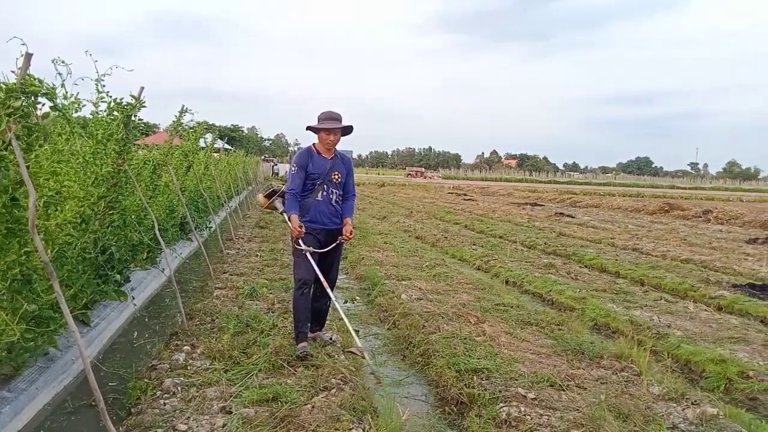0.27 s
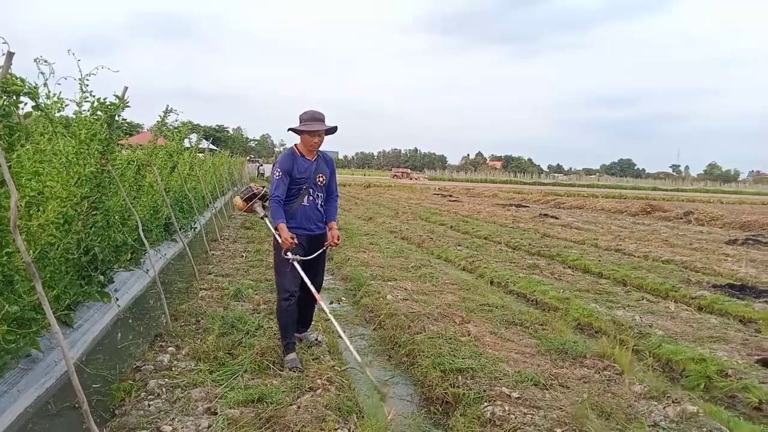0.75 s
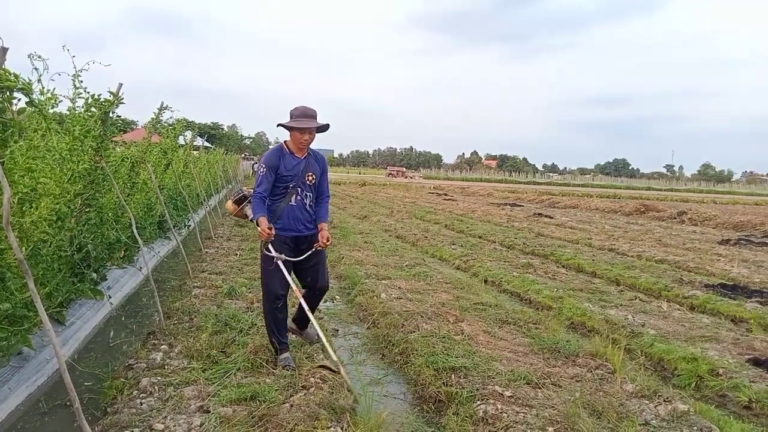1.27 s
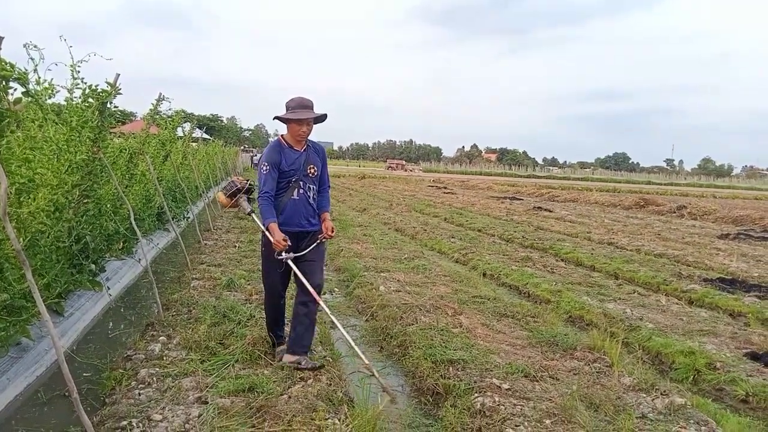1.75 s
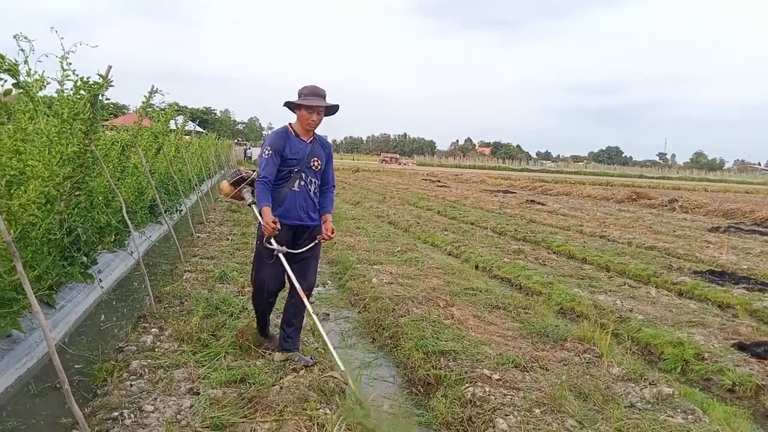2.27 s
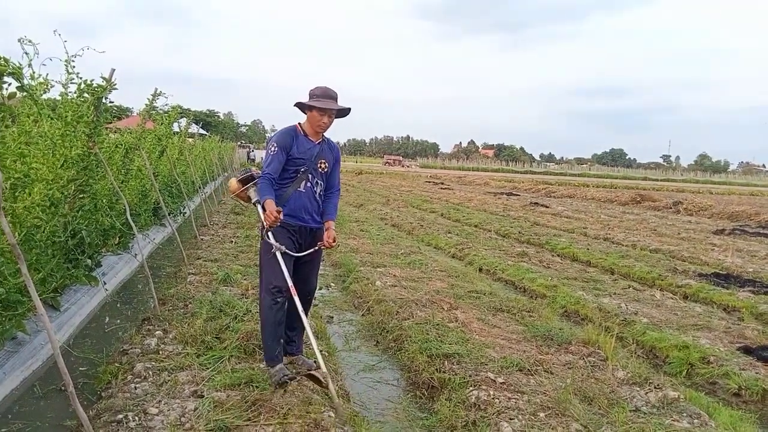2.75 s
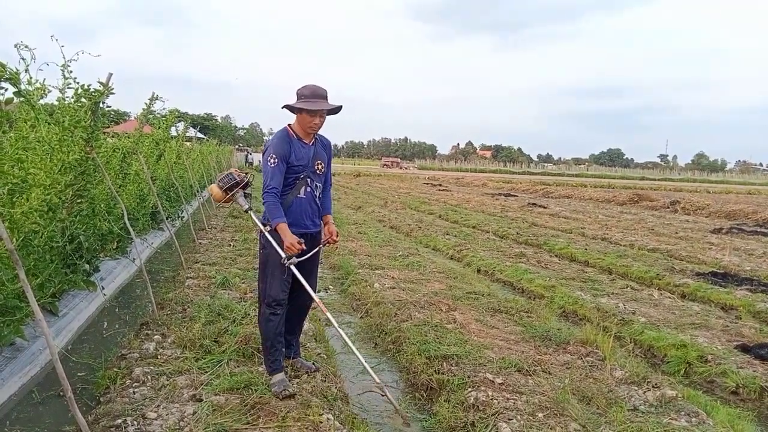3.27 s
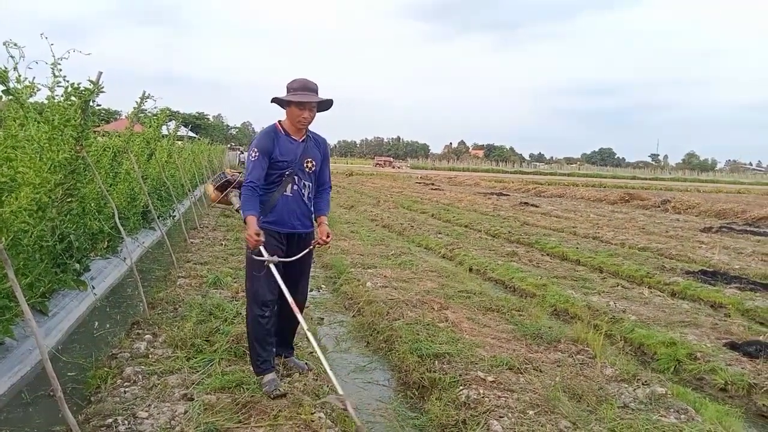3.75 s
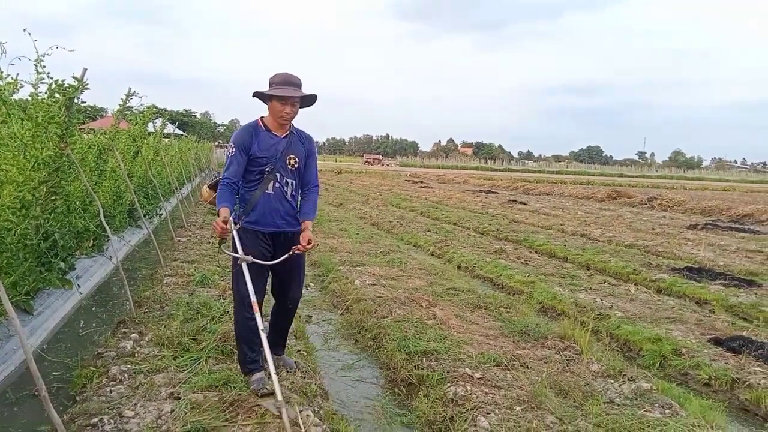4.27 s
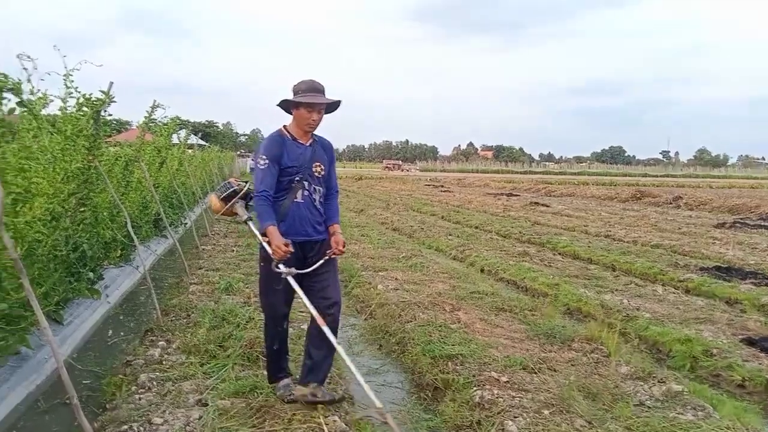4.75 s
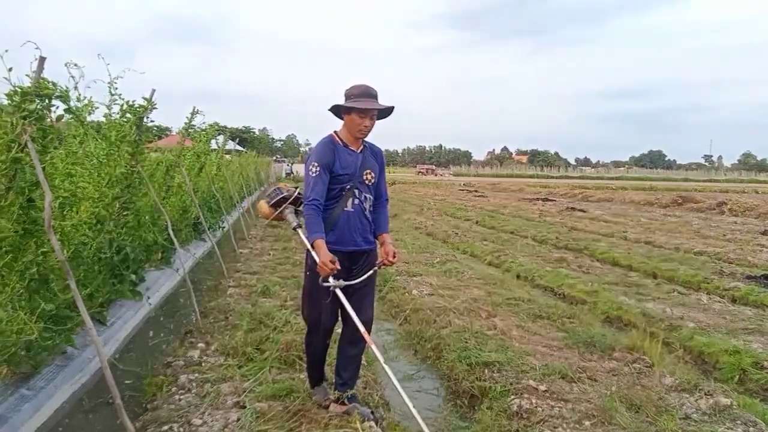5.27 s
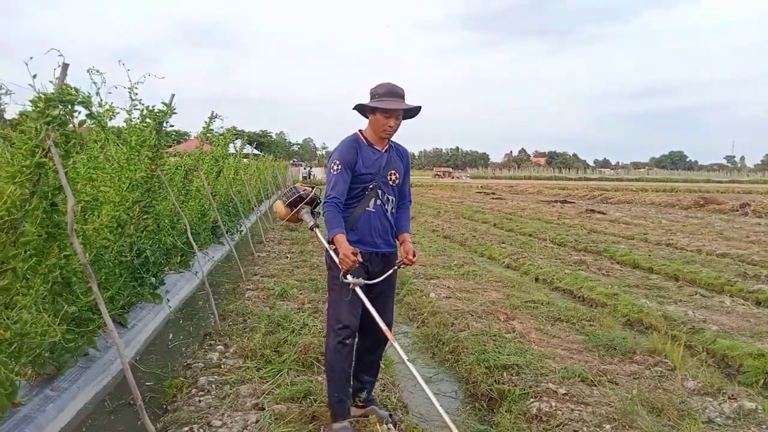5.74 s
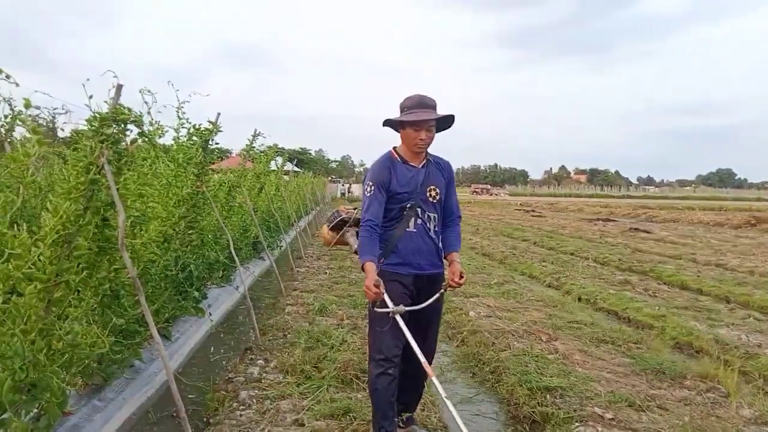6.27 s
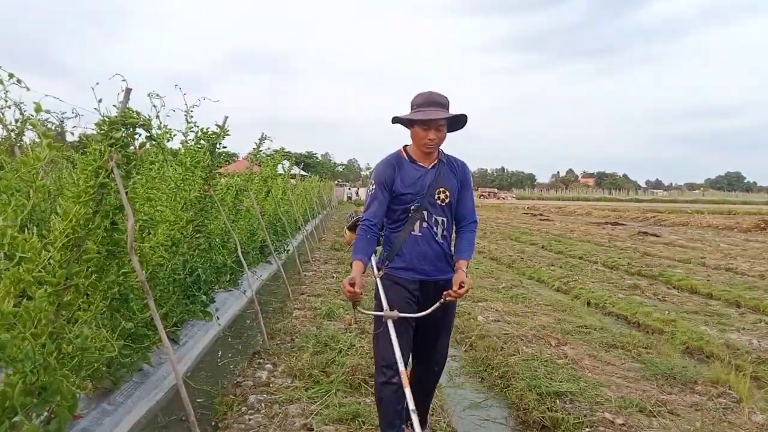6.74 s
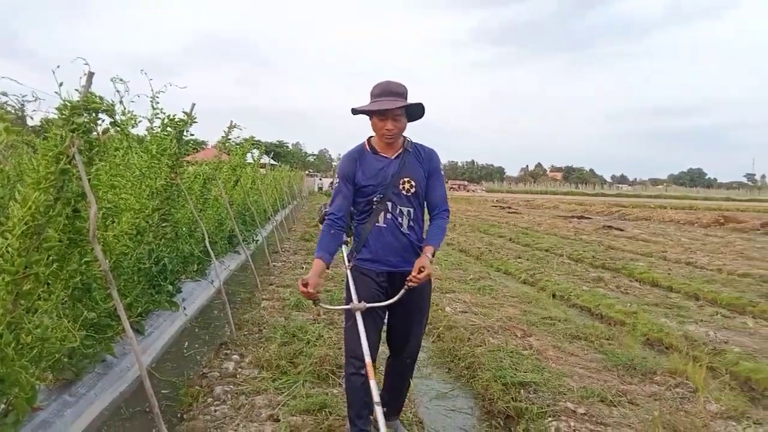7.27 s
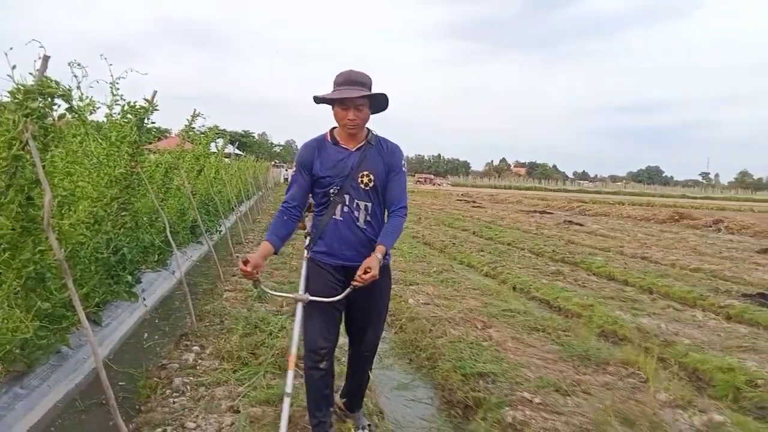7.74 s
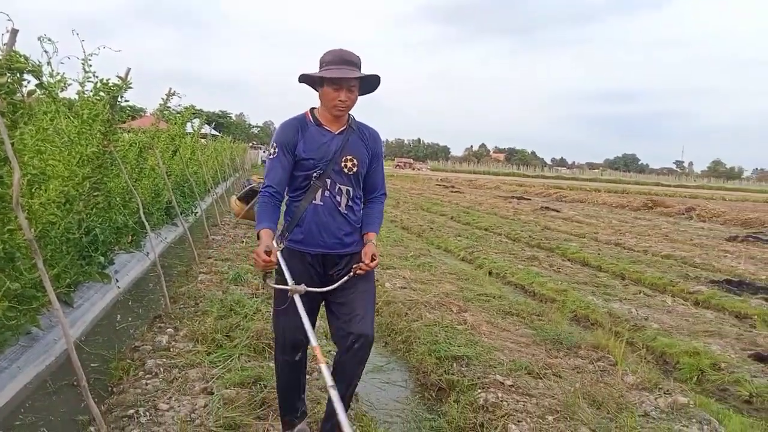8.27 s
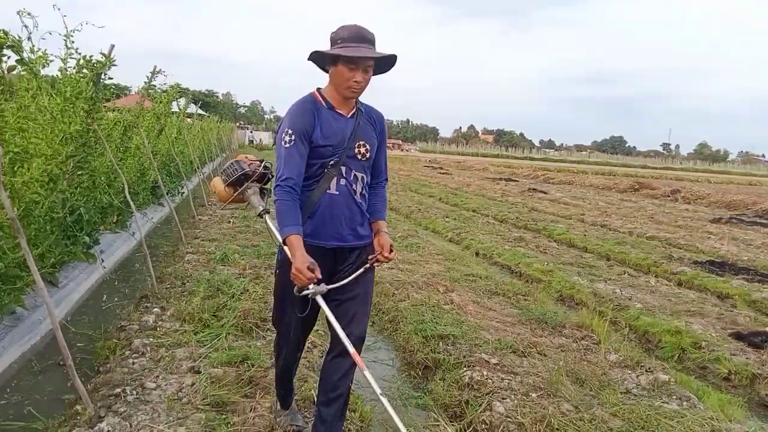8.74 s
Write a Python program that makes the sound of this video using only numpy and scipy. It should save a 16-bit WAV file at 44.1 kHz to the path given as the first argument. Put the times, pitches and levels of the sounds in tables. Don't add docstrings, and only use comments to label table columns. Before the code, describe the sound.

A petrol brush cutter drones and snarls steadily outdoors, its blade hissing through grass with sharp clicks and metallic rings as it comes closer.

```python
import sys
import numpy as np
from scipy import signal
from scipy.fft import rfft, irfft, next_fast_len
from scipy.io import wavfile
from scipy.ndimage import uniform_filter1d

SR = 44100
rng = np.random.default_rng(int(sys.argv[2]) if len(sys.argv) > 2 else 0)


def to_wav(sig):
    pcm = np.clip(np.atleast_2d(sig), -1, 1) * 32767
    pcm = np.round(pcm).astype(np.int16)
    wavfile.write(sys.argv[1], SR, pcm.T)


def boost(x):
    u = np.asarray(x, float) / 20
    return 10 ** u


N = 397341


def evened(x):
    return x / np.sqrt(np.mean(x ** 2) + 1e-20)


def curves(rows):
    s, *columns = np.transpose(rows)
    return [np.interp(np.arange(N) / SR, s, c) for c in columns]


def wander(hz):
    f = np.fft.rfftfreq(N // 64, 64 / SR)
    slow = irfft(rfft(rng.standard_normal(N // 64)) / (1 + (f / hz) ** 4), N // 64)
    return np.interp(np.arange(N) / 64, np.arange(N // 64), evened(slow))


def clicks(turns, spread_db):
    return (np.diff(np.floor(turns), prepend=9) > 0) * boost(spread_db * rng.standard_normal(N))


def decay(x, tau_s):
    return signal.lfilter([1], [1, -np.exp(-1 / (tau_s * SR))], x)


def swell(rows, column, t60_s):
    rise_s = 0.039
    t, power = np.arange(0, N, 64) / SR, 1e-12
    for row in rows:
        since = t - row[0]
        fall_db = np.where(since < 0, 9 * (since / rise_s) ** 2, 60 * since / t60_s)
        power = power + boost(row[column] - fall_db) ** 2
    return np.interp(np.arange(N) / SR, t, np.sqrt(power))


def butter(x, order, hz, kind):
    return signal.sosfilt(signal.butter(order, hz, kind, fs=SR, output="sos"), x)


def band(x, lo_hz, hi_hz):
    return evened(butter(x, 2, [lo_hz, hi_hz], "bandpass"))


def coloured(x, points):
    f, db = np.transpose(points)
    size = next_fast_len(N + 4096)
    hz = np.fft.rfftfreq(size, 1 / SR)
    gain = boost(np.interp(np.log(hz + 1), np.log(f + 1), db))
    return irfft(rfft(x, size) * gain, size)[:N]


def ring(x, modes):
    out = np.zeros(N)
    for hz, width, db in modes:
        pole = np.exp((2j * np.pi * hz - np.pi * abs(width)) / SR)
        out += boost(db) * signal.lfilter([1], [1, -pole], x + 0j).imag
    return out


def glide(x, hz, width):
    turn = np.exp(2j * np.pi * np.cumsum(hz) / SR)
    r = np.exp(-np.pi * width / SR)
    return (turn * signal.lfilter([1], [1, -r], x / turn)).imag


# time in seconds, muffler in view in dB, drive slack in dB.
POSE = [(0, -8, -9), (.3, 6, -2), (.8, 8.5, 0.5), (1.2, 0.5, -3), (1.86, 7.5, 1), (2.6, -6, -1.5),
        (3.0, -12, -6), (3.2, 3, 6), (3.6, 5.5, 3.5), (3.85, -1.5, -8), (4.24, -17, -5), (4.72, 5.5, -1),
        (5.1, 3, 5), (5.5, 0, 0), (6.2, -1, 3), (6.95, -32, -2), (7.9, -3, -3.5), (8.85, 11, 6)]
# time in seconds, drive beats per firing.
SLIP = [(0, 0.34), (2.2, 0.34), (3.35, 0.32), (4.2, .34), (4.95, 0.37), (5.8, 0.36), (6.85, .398),
        (7.8, 0.37), (8.3, 0.35), (9.01, .345)]
# delay in seconds, share returned.
ECHOES = [(.00255, .95), (.0051, .15)]


def engine(turns, near_db):
    view_db, slack_db = curves(POSE)
    rattle_db = slack_db - 33.5
    beat = np.cumsum(curves(SLIP)[0] * np.gradient(turns))
    sway = boost(11.5 + .45 * rattle_db) * np.cos(2 * np.pi * beat + .5 * wander(2))
    puff = np.exp(-(turns % 1) / .4) * rng.standard_normal(N)
    fire = evened(clicks(turns + .0014 * wander(60), .8) * (1 + .08 * sway))
    drive = fire + .065 * evened(puff)
    for s, share in ECHOES:
        drive = drive + share * np.roll(fire, round(s * SR))
    return (firing_orders(turns, sway, near_db, view_db) + muffler_can(turns, sway, puff)
            + outlet(fire, puff, drive) + loose_drive(beat, drive, rattle_db) + fin_whine(turns))


# multiple of the firing rate, level in dB.
ORDERS = [(1, -1), (2, -20), (3, -1), (4, -18), (5, -4), (6, -6), (7, 0), (8, 0), (9, -13), (10, -7),
          (11, -3), (12, -7)]


def firing_orders(turns, sway, near_db, view_db):
    lines = [boost(db + wander(55)) * np.cos(2 * np.pi * k * (turns - 0.02785 * k)) for k, db in ORDERS]
    dips = boost(1.5 * near_db) * (lines[3] + lines[8] + lines[9])
    upper = lines[1] + boost(.4 * near_db) * lines[2] + dips + boost(-.8 * near_db - 2) * lines[10] + lines[11]
    steady = boost(-43) * (lines[0] + upper * (.85 + .3 * sway)) / np.std(lines[0])
    hum = evened(lines[7]) * (1 + .08 * sway)
    return steady + boost(view_db - 42) * hum


# frequency in Hz, width in Hz, level in dB.
BODY = [(395, 50, 2), (555, 50, 3), (475, 50, -1)]
# time in seconds, level in dB.
CAN = [(0, -10), (.35, 0.5), (.95, 1), (1.15, -7.5), (1.6, 0.5), (2.05, 1), (2.5, -1.5), (3.15, 4),
       (3.5, 2), (3.95, -1.5), (4.3, -4), (4.8, 2.5), (5.3, 0.5), (5.5, 0.5), (6.2, -0.5), (6.8, -3),
       (7.6, -2.5), (8.25, -3.5), (8.6, 1.5), (9.01, 1)]


def muffler_can(turns, sway, puff):
    limp = .005 * (1 + .3 * wander(3)) * np.cos(np.pi * turns)
    thumps = clicks(turns + limp + .12, .5) * (1 + .4 * sway)
    boom = band(band(band(ring(thumps, BODY), 360, 660), 350, 680), 350, 700)
    boom = boom + .1 * band(band(puff, 370, 670), 370, 670)
    return boost(curves(CAN)[0] - 40.5) * evened(boom)


# time in seconds, level in dB, aim (upper ring over lower) in dB,
# lower ring in Hz, lowest ring in dB.
OUTLET = [(0, -28.5, -2.5, 1510, 5.5), (.6, -25, -11, 1540, -7), (.85, -21.5, -2.5, 1500, -12),
          (1.2, -25.5, -7, 1490, -2), (1.63, -23, -1.5, 1530, -1), (1.85, -26.5, -7.5, 1535, -5.5),
          (2.4, -25, -1.5, 1520, 1), (2.65, -26.5, -7.5, 1450, -17), (3.03, -26.5, 5, 1530, -1),
          (3.55, -33, -19, 1680, -6), (3.94, -27.5, 1, 1690, 3.5), (4.31, -34.5, -9, 1560, -1),
          (4.77, -25, -3, 1725, -4), (5.25, -25.5, -3.5, 1590, -2.5), (5.74, -22.5, -1.5, 1550, -7),
          (6.2, -23, -4, 1530, -9.5), (6.5, -22.5, -5, 1500, -2.5), (7.3, -26, 3.5, 1440, 2.5),
          (7.9, -30, 2, 1540, 2), (8.15, -24.5, 3, 1480, 2), (8.4, -21, -12, 1414, -10),
          (8.65, -25.5, -9.5, 1430, -0.5), (9.0, -23, -6.5, 1730, -2)]
# frequency in Hz, width in Hz, level in dB.
OUTLET_LOW = [(1115, 118, -5.5)]
OUTLET_HIGH = [(1855, 25, -11), (2119, 44, 2)]


def outlet(fire, puff, drive):
    outlet_db, aim_db, lower_hz, lowest_db = curves(OUTLET)
    upper_hz = 1973 + 11 * aim_db + 25 * wander(6)
    lowest = boost(lowest_db + 3.0 * wander(21)) * ring(1.4 * fire + .4 * evened(puff), OUTLET_LOW)
    low = band(lowest + glide(drive, lower_hz, 212), 1080, 1710)
    high = band(ring(drive, OUTLET_HIGH) + glide(drive, upper_hz, 193), 1620, 2040)
    return boost(outlet_db + aim_db / 2 - 4.0) * high - boost(outlet_db - aim_db / 2 - 9.0) * low


# frequency in Hz, width in Hz, level in dB.
CASING = [(2719, 110, 12), (3208, 34, -1), (3800, 110, 7), (5050, 250, 10)]
# time in seconds, level in dB.
KNOCKS = [(.42, -38), (.57, -37), (.95, -44), (1.3, -42), (1.62, -37), (2.0, -34), (2.07, -43), (2.25, -40),
          (3.2, -35), (3.47, -34), (3.75, -39), (4.35, -45), (4.9, -42), (5.45, -37), (6.3, -49),
          (8.4, -47), (8.75, -46)]


def loose_drive(beat, drive, rattle_db):
    bumps = evened(clicks(beat + .008 * wander(20), 1.2))
    burble = band(band(band(bumps, 350, 670), 350, 670), 340, 690)
    burble_level = np.hypot(swell(KNOCKS, 1, 0.7), boost(rattle_db - 16))
    scrape = np.exp(-(beat % 1) / 0.99) * rng.standard_normal(N)
    rattle = band(ring(bumps + 1.6 * scrape + 0.086 * drive, CASING), 2660, 3550)
    return burble_level * burble + boost(rattle_db - 3.5) * rattle


# time in seconds, level in dB.
FINS = [(0, -65), (4.4, -56), (4.9, -48), (6.2, -54), (6.5, -44), (7.1, -42), (7.4, -51), (7.8, -44),
        (8.2, -50), (9.01, -46)]


def fin_whine(turns):
    return boost(curves(FINS)[0]) * np.sqrt(2) * np.cos(2 * np.pi * 15 * turns)


# time in seconds, level in dB.
GRASS = [(0, 6), (.3, 5.5), (.98, 6), (1.4, 4), (2, 9.5), (2.7, 4), (2.82, 8), (3.05, 5.5), (3.6, 7),
         (3.85, 9), (4.3, 8), (4.8, 7.5), (5.5, 9), (6.15, 8.5), (7.05, 10), (7.5, 13), (8.05, 7),
         (9.01, 11)]
# time in seconds, grit in dB,
# then low, high and top plate rings in dB.
BITES = [(.05, -37.5, -58, -60, -68), (2.385, -28.5, -41, -34, -66), (2.43, -35, -36, -40, -59),
         (2.505, -25.5, -25, -29, -53), (3.69, -33.5, -55, -33, -70), (3.94, -29.5, -33, -34, -56),
         (4.15, -60, -29.5, -56, -66), (4.49, -47, -55, -43, -70), (5.04, -37, -55, -38, -70),
         (5.3, -30.5, -48, -29, -51), (5.42, -35, -38, -50, -55), (6.56, -28, -32, -36, -34),
         (6.614, -26.5, -18.5, -30, -51), (6.68, -29.5, -38, -29.5, -35), (6.769, -29.5, -31, -22.5, -35),
         (6.88, -42, -24, -27, -61), (7.25, -26.5, -41, -27, -42), (7.33, -44, -32, -50, -60),
         (7.55, -49, -25.5, -32, -60), (7.6, -49, -34, -40, -60), (7.71, -42, -26, -28, -48),
         (7.81, -48, -25, -30.5, -60), (7.66, -45, -27, -29.5, -42), (7.76, -41, -24, -36, -55),
         (7.85, -43, -28, -38, -65), (7.935, -30, -40, -28, -50), (8.66, -34, -58, -50, -72)]


def blade(turns):
    grass_db, = curves(GRASS)
    spin = 2 * np.pi * .692 * turns
    cut = np.hypot(boost(grass_db - 44), swell(BITES, 1, 0.33))
    rub = rubbing(spin)
    swish = band(band(rub, 2300, 19000), 2000, 19000)
    hit, low_hit = strikes()
    spray = decay(hit, 0.0051) * rng.standard_normal(N)
    return (grass_hiss(rub, cut * swish, spray, hit) + guard(rub, spin, grass_db)
            + struck_steel(spin, cut * swish, spray, hit, low_hit) + plate(spin) + pings() + ticks())


def rubbing(spin):
    size = boost(3.6 * np.minimum(rng.exponential(1, N), 3))
    grit = size * (rng.random(N) < 2500 / SR) * rng.choice([-1, 1], N)
    pulse_db = 2.0 * np.cos(2 * spin) + 0.57 * np.cos(spin) + 2.3 * wander(39)
    return (evened(grit) + 1.64 * rng.standard_normal(N)) * boost(pulse_db)


# time in seconds, peak in dB, dull ring over peak in dB.
STRIKES = [(0.088, -24, -6), (2.2282, -17, 6), (2.4407, -17, 8), (2.47, -17.5, 13), (2.5019, -16, 17.5),
           (2.5347, -28, 23), (3.4712, -18, 2), (3.706, -17.5, 3), (3.914, -26, -5), (4.1063, -26, 7),
           (5.2806, -14, 5), (5.3012, -9, -3), (5.5113, -21, 14), (5.595, -18, 7), (6.5214, -14.5, 0),
           (6.567, -9.5, -19), (6.587, -9, 4), (6.6645, -19, -2), (6.7022, -11, 5), (6.767, -13, -16),
           (6.8799, -12.5, -7), (7.1825, -14, 3), (7.2093, -14, 4), (7.3147, -17.5, 9), (7.4013, -13.5, -6),
           (7.658, -22, -19), (7.701, -11, -3), (7.755, -23, -1), (7.901, -10.5, -12)]


def strikes():
    hit, low_hit = np.zeros((2, N))
    for s, peak_db, low_ring_db in STRIKES:
        hit[round(s * SR)] += boost(peak_db)
        low_hit[round(s * SR)] += boost(peak_db + low_ring_db)
    return hit, low_hit


# frequency in Hz, level in dB per Hz.
HISS = [(530, -4), (900, -0.5), (1260, 13.5), (1470, 16.5), (1670, 5), (1910, 15), (2450, 0), (2830, -8),
        (3720, -7.5), (4040, -13), (5850, -22), (6750, -27), (10600, -41), (13800, -28), (15600, -39)]


def grass_hiss(rub, swish, spray, hit):
    mix = boost(20.5) * swish + boost(-23) * spray + boost(-9) * hit
    return coloured(mix, HISS) / np.std(coloured(rub, HISS))


# frequency in Hz, width in Hz, level in dB.
GUARD = [(3894, 110, 10), (4050, 210, 4.5), (4597, 42, 0)]


def guard(rub, spin, grass_db):
    brushed = boost(grass_db - 38.5 + 3.0 * wander(1.9))
    level = np.hypot(brushed, boost(8) * swell(BITES, 3, 0.43))
    return level * boost(-11.5) * band(ring(rub, GUARD), 4010, 4396) * (1 + 0.15 * np.cos(spin))


# frequency in Hz, width in Hz, level in dB.
BLADE_LOW = [(1350, 12, -8), (1160, 14, -12), (1870, 12, -3), (1945, 14, -6), (2155, 14, 0), (2265, 10, -9)]
BLADE_HIGH = [(4035, 16, 0), (3830, 12, -6), (4352, 10, -4), (3188, 12, -6), (2905, 14, -6),
              (5480, 30, -24), (6340, 30, -26)]


def struck_steel(spin, swish, spray, hit, low_hit):
    sweep = evened(.5 + 0.38 * np.cos(spin) + .5 * np.cos(2 * spin + 1))
    bright = ring(boost(-27) * hit + boost(-31.5) * spray + boost(-39) * swish, BLADE_HIGH)
    dull = ring(boost(-14.5) * low_hit, BLADE_LOW)
    return butter(sweep * bright + dull, 2, 1000, "highpass")


# frequency in Hz, level in dB, share swept by the turning.
PLATE = [(1453, -2, .8), (3977, -1, .9), (3522, -2, .8), (5176, -2, .1)]
RING_T60_S = [0.93, 0.49, 0.38, 0.17]
# time in seconds, level in dB.
SIDE_BITES = [
    (6.56, -38),
    (6.73, -38),
    (6.775, -24),
    (6.89, -34),
    (7.24, -36),
    (7.7, -42),
    (7.93, -33),
]


def plate(spin):
    slip, rasp_db = .45 * wander(30), 1.5 * wander(50)
    sources = [(BITES, 2), (BITES, 3), (SIDE_BITES, 1), (BITES, 4)]
    out = np.zeros(N)
    for (hz, db, swept), (rows, column), t60_s in zip(PLATE, sources, RING_T60_S):
        start = 2 * np.pi * rng.random(4)
        phase = 2 * np.pi * hz * np.arange(N) / SR + slip
        side = np.cos(phase + spin + start[1])
        side = side + 0.7 * np.cos(phase - spin + 2 * start[0] - start[1])
        side = side + 0.18 * np.cos(phase - 2 * spin + start[3])
        lines = np.cos(phase + start[0]) + swept * side
        out += swell(rows, column, t60_s) * boost(db + rasp_db) * evened(lines)
    return out


# time in seconds, peak in dB, frequency in Hz, decay to -60 dB in seconds.
PINGS = [(2.3635, -29, 5310, 0.025), (2.469, -18, 2150, 0.046), (2.4753, -32, 8200, .03),
         (2.4995, -25, 6090, 0.04), (2.5025, -18, 2160, 0.022), (3.148, -36, 5100, .02),
         (3.5094, -33, 5100, .02), (3.66, -41, 5400, 0.038), (3.9305, -38, 6360, .04),
         (3.971, -37, 5430, .04), (4.4837, -39, 5430, 0.039), (7.756, -32, 5420, 0.11),
         (5.31, -33, 5400, 0.1), (5.312, -30, 6630, 0.045), (5.5967, -27, 6500, .015),
         (5.675, -41, 5570, .04), (6.071, -38, 5550, 0.038), (6.528, -18, 4360, 0.19),
         (6.567, -21, 2850, .12), (6.57, -24, 4330, 0.22), (6.585, -30, 6700, 0.048),
         (6.64, -21, 2850, .15), (6.70, -22, 4330, 0.33), (6.76, -36, 6800, .05), (6.879, -40, 6300, 0.066),
         (7.182, -18, 2040, 0.033), (7.221, -32, 6850, 0.04), (7.25, -36, 6300, 0.017),
         (7.40, -38, 5160, 0.054), (7.4894, -47, 6070, .04), (7.5073, -36, 5320, .05),
         (7.626, -26, 4250, .25), (7.65, -33, 5400, .15), (7.66, -39, 6050, 0.26), (7.701, -33, 5510, 0.23),
         (7.754, -28, 3200, 0.21), (7.90, -36, 5400, .3), (7.905, -25, 3240, 0.32),
         (7.9278, -17, 4000, 0.19), (8.627, -39, 5380, 0.038)]


def pings():
    out, spit, t = np.zeros(N + SR), np.zeros(N), np.arange(SR // 3) / SR
    for s, db, hz, t60 in PINGS:
        i = round(s * SR)
        rise = np.minimum(t / (0.00014 + 0.085 * t60), 1)
        out[i:i + len(t)] += boost(db - 60 * t / t60) * rise * np.sin(2 * np.pi * hz * t)
        spit[i] = boost(-43.5 + .5 * (db + 21.0))
    dust_hz = 13940
    dust = decay(spit, 0.0057) * band(rng.standard_normal(N), 0.83 * dust_hz, 1.16 * dust_hz)
    return out[:N] * boost(4.5 * wander(140)) + dust


# time in seconds, treble
# peak in dB, body over treble in dB.
TICKS = [(0.0245, -32.5, 5), (0.086, -33, 8), (0.5756, -41, 10), (1.4346, -43, 8), (1.5753, -38, 14),
         (1.6132, -44, 8), (1.6482, -42, 8), (1.9495, -44, 6), (1.9894, -36, 8), (2.0278, -36, 8),
         (2.0652, -37, 8), (2.3455, -29, 10), (3.9115, -38, 6), (3.93, -31, 8), (4.0048, -41, 8),
         (4.0567, -42, 6), (4.0701, -35, 8), (4.1036, -33, 8), (4.1654, -44, 8), (4.2138, -38, 8),
         (4.2494, -33, 15), (4.2916, -32, 15), (4.3385, -36, 8), (4.4568, -39, 8), (5.3014, -18, 12),
         (5.3194, -38, 6), (7.4101, -39, 5), (7.5617, -33, 3), (7.647, -31, 10), (7.658, -25, 4),
         (7.8231, -34, 8), (8.2079, -34, 10), (8.4038, -37, 8), (8.7615, -38, 10),
         (2.5035, -26, 8),
    (5.2835, -28, 14),
    (5.292, -26, 14),
    (5.328, -30, 19),
    (6.589, -28, 15),
    (7.2095, -28, 21),
    (7.219, -24, 20),
    (7.3155, -28, 14),
]
# frequency in Hz, width in Hz, level in dB.
TICK_BODY = [(2100, 800, 0), (3000, 700, -5), (4300, 1200, -1)]
TICK_TREBLE = [(6600, 2700, -11), (8200, 1100, -12.5), (13700, 1800, -7)]


def ticks():
    treble, body = np.zeros((2, N))
    for s, db, body_db in TICKS:
        treble[round(s * SR)] = boost(db)
        body[round(s * SR)] = boost(db + body_db)
    crumbs = .18 * rng.standard_normal(N) * decay(treble, 0.01)
    snap = ring(treble + crumbs, TICK_TREBLE) + butter(ring(body, TICK_BODY), 4, 5600, "lowpass")
    return butter(snap, 4, 1300, "highpass")


def field(x):
    t = np.arange(SR // 8) / SR
    tail = rng.standard_normal(len(t)) * boost(-60 * t / 0.07) * (t > .008)
    taps = boost(-18) * tail / np.linalg.norm(tail)
    taps[0] = 1
    return signal.oaconvolve(x, taps)[:N]


# frequency in Hz, level in dB per Hz.
FLOOR = [(20, -16), (60, -10.5), (110, -2.5), (160, -11), (210, -3.5), (270, -9), (330, -9.5), (500, -10),
         (760, -9), (900, -13), (1100, -4.5), (1350, -7.5), (2000, 0), (2800, -11), (4000, -33),
         (5200, -39), (10000, -45.5), (14000, -62)]


def wash(wash_db):
    air = 1.19 * evened(coloured(rng.standard_normal(N), FLOOR))
    rumble = signal.sosfiltfilt(signal.butter(4, 215, fs=SR, output="sos"), air)
    return boost(wash_db + 1.2 * wander(7.9)) * (air - rumble) + boost(-38.5) * rumble


# time in seconds, firings in Hz.
SPEED = [(0, 78.9), (.3, 78.7), (.8, 79.8), (1.25, 78.5), (1.8, 79.8), (2.38, 77.8), (2.56, 75),
         (2.93, 75.5), (3.55, 78), (4.3, 78.2), (4.99, 80.6), (5.24, 80.3), (5.45, 78.8), (6.25, 79.5),
         (6.65, 77.7), (7.4, 79.3), (7.72, 78.1), (8.86, 81.6)]
# time in seconds, wash level in dB.
APPROACH = [
    (0, -39),
    (2.3, -37),
    (3, -34),
    (5.5, -32.5),
    (9.01, -30.5),
]


def scene():
    hz, = curves(SPEED)
    turns = np.cumsum(uniform_filter1d(hz, size=3000)) / SR
    wash_db, = curves(APPROACH)
    machine = engine(turns, wash_db + 34.0) + blade(turns)
    return (field(machine) + wash(wash_db))[None]


def low_pass(x):
    return signal.sosfilt(signal.butter(12, 15710, fs=SR, output="sos"), x)


def record(dry):
    thin = butter(dry, 2, 55, "highpass")
    thin = signal.oaconvolve(thin, signal.firwin(255, 15450, fs=SR)[None], "same")
    return low_pass(thin)


dry = scene()
out = record(dry)
to_wav(out)
```